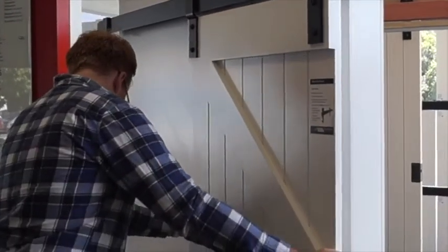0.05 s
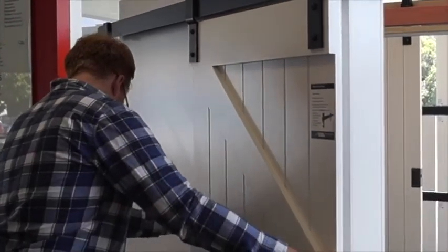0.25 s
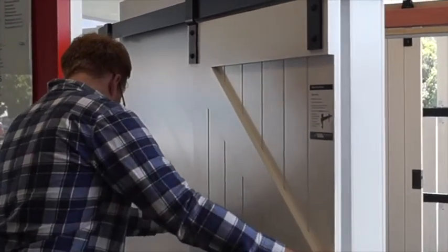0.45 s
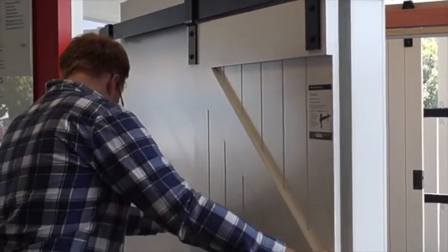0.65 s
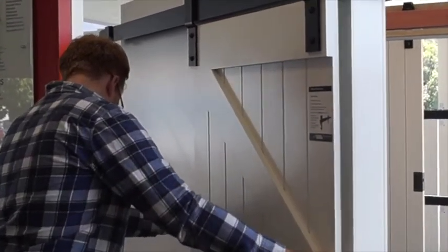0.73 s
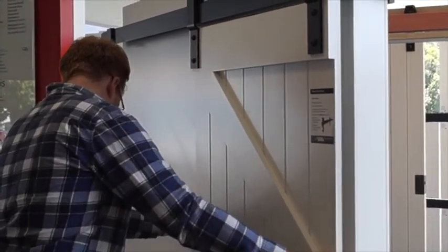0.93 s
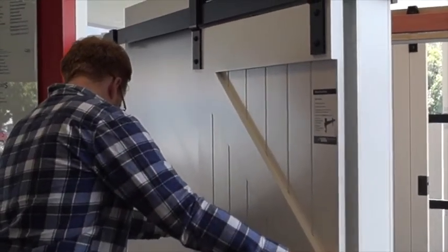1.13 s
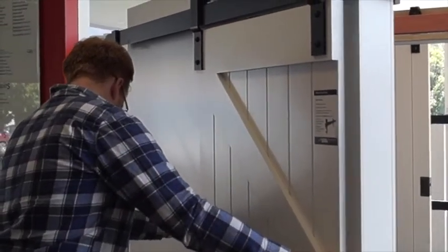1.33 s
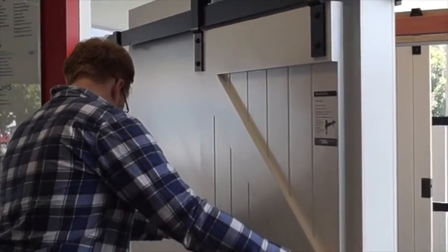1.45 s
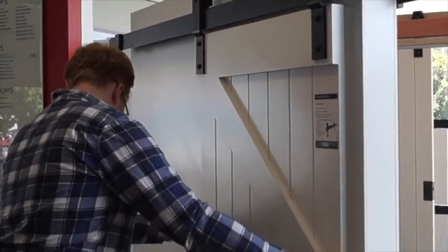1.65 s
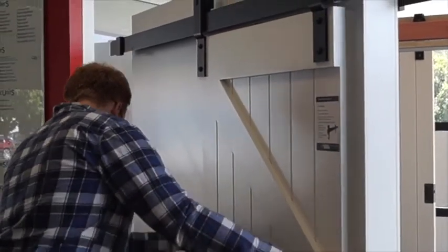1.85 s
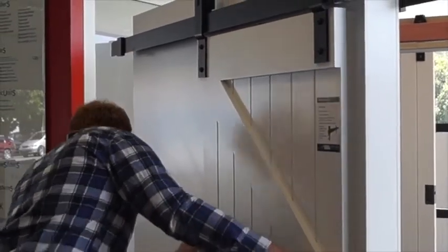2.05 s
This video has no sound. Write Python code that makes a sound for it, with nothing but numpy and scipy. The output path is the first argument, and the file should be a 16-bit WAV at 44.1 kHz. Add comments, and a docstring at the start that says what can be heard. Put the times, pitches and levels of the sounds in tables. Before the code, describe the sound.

A wooden sliding door thuds twice on its track, followed by a short hiss.

```python
"""In a large, hard-walled room a wooden sliding door is jolted twice on its track.
Each jolt is a cluster of blows that crack at the contact, excite the normal modes of the panel and its
steel hangers, and leave a low reverberant boom. The hardware ticks; in the second jolt the latch snaps
and the door rebounds from its stop. A hiss then swells and dies away. Soft knocks open and close
the scene, over faint rubbing and quiet ventilation noise."""
import sys
import numpy as np
from scipy import signal
from scipy.fft import rfft, irfft
from scipy.io import wavfile

SR = 44100
rng = np.random.default_rng(int(sys.argv[2]) if len(sys.argv) > 2 else 0)


def output_pcm(signal):
    """Save a mono or channel-first signal as 16-bit PCM at the path in sys.argv[1].

    Samples are clipped to [-1, 1] before scaling.
    """
    pcm = np.clip(np.atleast_2d(signal).T, -1, 1) * 32767
    wavfile.write(sys.argv[1], SR, np.round(pcm).astype(np.int16))


N = 92610

# Noise spectra of the sources. Each row: frequency in Hz, relative spectral density in dB.
AIR_SPECTRUM = [(25, -22), (45, 2), (68, -14.5), (100, 5.5), (140, -2), (250, -1), (500, -7.5), (1100, -18),
                (2000, -21), (4000, -22.5), (8000, -26), (11000, -29)]
RUB_SPECTRUM = [(100, -35), (500, 0), (1200, -1), (2200, -9.5), (4000, -17), (11000, -34)]
HISS_SPECTRUM = [(35, -10), (50, -17), (61, 15.5), (80, -19), (110, -1), (250, -1), (600, 1), (1200, 5),
                 (2000, 0), (3000, -2.5), (4000, -2), (6000, -7), (8500, -8.5), (11000, -14)]
KNOCK_SPECTRUM = [(40, -21), (90, -24), (140, -4), (200, 1), (340, -6), (450, -16), (700, -8), (1500, -32),
                  (5000, -52)]
TICK_SPECTRUM = [(100, -18), (600, -5.5), (1200, 0.5), (1900, 0), (2400, -6), (2900, -13), (5000, -22),
                 (11000, -33)]
LATCH_SPECTRUM = [(1000, -15), (2500, 10.5), (4000, -4), (5150, 8), (6300, -20), (7900, 0.5), (9000, -11),
                  (11000, -14)]
CRACK_SPECTRUM = [(200, -27), (1000, 2), (2200, 0.5), (3200, -6), (4200, -10.5), (6300, -9), (8000, -16.5),
                  (11000, -8.5)]
BOARD_SPECTRUM = [(80, -21), (130, -11), (200, 6), (280, -4.5), (340, -8), (440, 1), (540, -7), (660, -9),
                  (850, -20), (1050, -12.5), (1400, -31), (4000, -46)]
BOOM_SPECTRUM = [(30, -33), (60, -32), (100, -12), (150, -4), (260, -2), (420, -5.5), (700, -8.5),
                 (850, -12.5), (1080, -11.5), (1500, -17.5), (2300, -23), (4000, -23.5), (5500, -35.5),
                 (7000, -51), (11000, -55)]
# Reverberant decay. Each row: frequency in Hz, time to fall 60 dB (T60) in seconds.
HISS_DECAY = [(60, 2.5), (400, 1.1), (1200, 1.07), (3000, 0.85), (6000, 0.75), (10000, 0.43)]
BOOM_DECAY = [(60, 1.26), (160, 1.31), (420, 1.284), (1100, 1.01), (2900, 0.42), (7700, 1.23)]
# Stereo width of room sounds and ventilation. Each row: frequency in Hz, side minus mid level in dB.
ROOM_WIDTH = [(30, -26), (60, -30), (150, -17), (340, -11), (700, -7.5), (1900, -6.5), (3500, -4.5),
              (6200, -2.5), (11000, 2)]
AIR_WIDTH = [(60, -21), (150, -15), (400, -3.5), (1000, 7), (2000, 7), (4000, 1), (8000, 1)]
# Tones of the ventilation. Each row: frequency in Hz, level in dB.
DRONE_TONES = [(68, -63), (138, -58)]
# Course of the rubbing. Each row: time in seconds, level in dB.
RUB_LEVELS = [(0, -45), (.18, -50.5), (0.501, -47), (.65, -52), (1.65, -62), (1.778, -54.5), (1.9, -56.5),
              (2.1, -58)]
# Soft knocks of the door. Each row: start in seconds, level in dB.
DOOR_KNOCKS = [(0.0, -41), (0.074, -41), (0.138, -54), (1.871, -44.5), (1.90, -50), (1.946, -47)]
# Ticks of the track hardware. Each row: start in seconds, level in dB, tilt in dB per octave,
# level of the steel ring in dB, T60 of the clack in seconds.
TRACK_TICKS = [(0.0, -45, -5.5, -69, 0.085), (0.016, -37, -2, -56, 0.11), (0.036, -50, -7, -55, 0.065),
               (0.697, -50, -2, -38.5, 0.049), (1.817, -51.5, 3, -65, 0.25), (1.973, -59, 6, -72, 0.11)]
# Natural frequencies of the steel hangers and the wooden panel. Each entry: frequency in Hz.
HANGER_FREQUENCIES = [1234, 1354, 1523, 1798, 1892, 1990, 3250, 3685, 5150, 7900]
PANEL_FREQUENCIES = [58, 87, 134.5, 194.5, 234, 337.5, 404, 458, 488, 625, 684, 762, 972, 1167.5]
# Their modes, in the same order. Each row: relative level in dB, T60 in seconds.
HANGER_MODES = [(3, 0.45), (-12, 0.38), (-15, 0.98), (-15, 0.48), (-38, 0.35), (1.5, 0.22), (12, 0.034),
                (-1, 0.19), (-24, 0.086), (-11, .1)]
PANEL_MODES = [(-10, 1.2), (-10, 1.3), (-4, 0.93), (7, 0.76), (1, 1.33), (2, 0.73), (1, 0.42), (-0.5, 1.56),
               (-1.5, 1.3), (3, 0.59), (-5, 1.4), (-12, 1.5), (-2, 0.5), (-3.5, 1.13)]
# Modes of the rebound. Each row: frequency in Hz, relative level in dB, T60 in seconds.
REBOUND_MODES = [(61.5, -20, 0.26), (115, -14, 0.19), (131.4, 0.5, 0.23), (174, -1.5, 0.14)]
# Blows on the door. Each row: start in seconds, level in dB, panel level in dB, corner in Hz set by
# contact hardness, crack level in dB, crack corner in Hz, build-up in seconds.
DOOR_BLOWS = [(0.2046, -20.5, -24, 1850, -37, 7000, 0.0019), (0.2342, -27, -30.5, 1200, -56, 4000, 0.0035),
              (0.692, -25, -25.5, 2600, -40.5, 8100, 0.0033), (0.724, -25.5, -31, 2600, -62, 5000, .002),
              (0.748, -28, -33, 2190, -52, 5500, 0.002), (0.776, -30, -36, 1520, -58, 3000, 0.0034)]

TOP_HZ = 11050


def undb(db):
    """Amplitude ratio of a level in decibels."""
    return 10 ** (np.asarray(db) / 20)


def at(table, hz):
    """Interpolation of a table on a logarithmic frequency axis."""
    frequencies, values = np.array(table, float).T
    return np.interp(np.log(np.maximum(hz, 1)), np.log(frequencies), values)


def since(start):
    """Seconds elapsed since an onset, zero before it."""
    return np.maximum(np.arange(N) / SR - start, 0)


def fade(t, t60):
    """Damping: exponential decay by 60 dB in t60 seconds."""
    return np.exp(-np.log(1000) * t / t60)


def rise(t, rise_s):
    """Exponential approach to full amplitude, with time constant rise_s."""
    return 1 - np.exp(-t / rise_s)


def contact_gain(hz, corner_hz, order=2):
    """A contact acts as a low-pass filter: the softer it is, the lower its corner."""
    return 1 / np.sqrt(1 + (hz / corner_hz) ** (2 * order))


def noise(spectrum, tilt_db=0, corner_hz=np.inf, order=2, width=ROOM_WIDTH):
    """Random phases make stereo noise of a given spectrum; the mid has unit RMS before the roll-off."""
    hz = np.arange(N // 2 + 1) * SR / N
    octaves = np.log2(np.maximum(hz, 100) / 500)
    gain = undb(at(spectrum, hz) + tilt_db * octaves) * (hz > 20) * (hz < TOP_HZ + 500)
    mid, side = np.exp(2j * np.pi * rng.random((2, len(hz)))) * gain
    side = side * undb(at(width, hz))
    stereo = np.array([mid + side, mid - side]) * contact_gain(hz, corner_hz, order)
    return irfft(stereo, N) / np.std(irfft(mid, N))


def by_band(x, envelope):
    """Frequency-dependent decay: each octave band follows the envelope of its centre frequency."""
    centres = 45 * 2. ** np.arange(9)
    hz, spectrum = np.arange(N // 2 + 1) * SR / N, rfft(x)
    out = 0
    for centre in centres:
        band_gain = at(list(zip(centres, centres == centre)), hz)
        out = out + irfft(spectrum * band_gain, N) * envelope(centre)
    return out


def ring(frequencies, modes, t, corner_hz=np.inf):
    """Modal superposition: damped sinusoids, each with a random phase difference between the ears."""
    rise_cycles = 0.27
    out = 0
    for hz, (db, t60), spread_rad in zip(frequencies, modes, rng.standard_normal(len(modes))):
        phase = 2 * np.pi * hz * t + spread_rad * np.array([[.5], [-.5]])
        envelope = rise(t, rise_cycles / hz) * fade(t, t60)
        out = out + undb(db) * contact_gain(hz, corner_hz) * envelope * np.sin(phase)
    return .5 * out


def widen(x, t):
    """Direct sound starts in the centre; wall reflections then spread the image."""
    mid = x.mean(axis=0)
    return mid + (x - mid) * rise(t, rise_s=0.013)


def ventilation():
    """Moving air gives steady broadband noise, with a low tonal drone superposed."""
    t = since(0)
    drone = sum(undb(db) * np.sqrt(2) * np.sin(2 * np.pi * (hz * t + rng.random()))
                for hz, db in DRONE_TONES)
    return undb(-52.5) * noise(AIR_SPECTRUM, width=AIR_WIDTH) + drone


def rubbing():
    """Sliding friction between door and track makes faint noise of varying level."""
    times, db = np.array(RUB_LEVELS).T
    return noise(RUB_SPECTRUM) * undb(np.interp(since(0), times, db))


def hiss():
    """A rush like released air swells, holds and decays by reverberation, treble first."""
    start, swell_s, release_after_s, lag_s_per_octave = 1.006, 0.095, 0.17, 0.0047

    def release(hz):
        lag_s = lag_s_per_octave * np.log2(TOP_HZ / max(hz, 1400))
        return fade(since(start + release_after_s + lag_s), at(HISS_DECAY, hz))

    swell = np.sin(np.pi / 2 * np.minimum(since(start) / swell_s, 1))
    return undb(-33) * swell * by_band(noise(HISS_SPECTRUM), release)


def knocks():
    """Soft impacts excite mainly low frequencies, so the shifted door bumps dully."""
    out = 0
    for start, db in DOOR_KNOCKS:
        t = since(start)
        out = out + undb(db) * noise(KNOCK_SPECTRUM) * rise(t, rise_s=0.0096) * fade(t, t60=0.47)
    return out


def impact_envelope(t, t60, room_db, room_t60):
    """Double-slope decay: an abrupt direct sound dies fast over a weaker reverberant tail."""
    return (t > 0) * (fade(t, t60) + undb(room_db) * fade(t, room_t60))


def ticks():
    """Brief impacts in the hardware clack and set the steel hangers into free vibration."""
    out = 0
    for start, db, tilt_db, ring_db, t60 in TRACK_TICKS:
        t = since(start)
        clack = noise(TICK_SPECTRUM, tilt_db) * impact_envelope(t, t60, room_db=-11.5, room_t60=0.48)
        steel = ring(HANGER_FREQUENCIES, HANGER_MODES, t)
        out = out + widen(undb(db) * clack + undb(ring_db) * steel, t)
    return out


def latch():
    """A hard steel contact is brief, so the latch's single snap is rich in treble."""
    t = since(0.732)
    envelope = impact_envelope(t, t60=0.022, room_db=-12.5, room_t60=0.28)
    return undb(-35.5) * widen(noise(LATCH_SPECTRUM), t) * envelope


def rebound():
    """A cushioned push against the stop excites low, heavily damped modes: a short, deep thump."""
    t, swell_s = since(0.764), 0.02
    push = np.sin(np.pi / 2 * np.minimum(t / swell_s, 1)) ** 2
    modes = np.array(REBOUND_MODES)
    return undb(-8.5) * push * ring(modes[:, 0], modes[:, 1:], t)


def room_boom(t, corner_hz):
    """Densely overlapping modes of door and room merge into noise that decays band by band."""
    rise_cycles = 0.33
    return by_band(noise(BOOM_SPECTRUM, corner_hz=corner_hz),
                   lambda hz: rise(t, rise_cycles / hz) * fade(t, at(BOOM_DECAY, hz)))


def door_blows():
    """Impulsive excitation: the contact cracks, boards knock, panel and hangers ring, the room booms."""
    out = 0
    for start, db, panel_db, corner_hz, crack_db, crack_hz, build_s in DOOR_BLOWS:
        t = since(start)
        boom = room_boom(t, corner_hz)
        boards = undb(3) * noise(BOARD_SPECTRUM, corner_hz=corner_hz) * fade(t, t60=0.25)
        crack = noise(CRACK_SPECTRUM, corner_hz=crack_hz, order=7)
        crack *= impact_envelope(t, t60=0.15, room_db=-7, room_t60=0.84)
        hangers = undb(-26) * ring(HANGER_FREQUENCIES, HANGER_MODES, t, corner_hz)
        panel = ring(PANEL_FREQUENCIES, PANEL_MODES, t, corner_hz)
        body = undb(db) * (boom + boards + hangers) + undb(panel_db) * panel
        out = out + widen(body * rise(t, build_s) + undb(crack_db) * crack, t)
    return out


def scene():
    """Linear superposition: the pressures of door, hiss and background add."""
    door = door_blows() + rebound() + latch() + knocks() + ticks()
    return door + hiss() + rubbing() + ventilation()


def record(dry):
    """Band limiting: an elliptic low-pass filter cuts the treble steeply above TOP_HZ."""
    return signal.sosfilt(signal.ellip(12, .1, 80, TOP_HZ, fs=SR, output="sos"), dry)


dry = scene()
out = record(dry)
output_pcm(out)
```